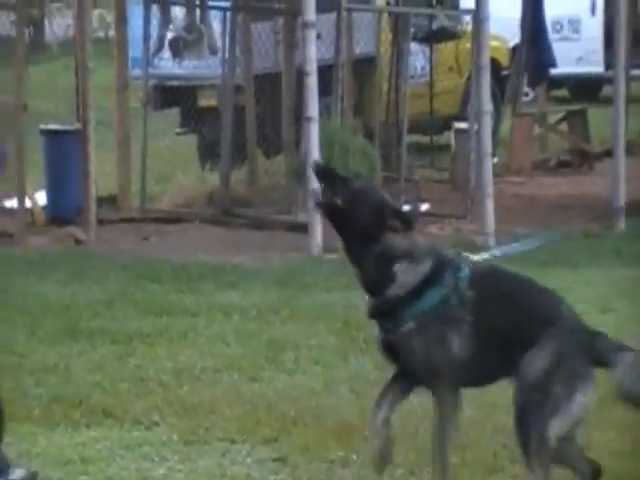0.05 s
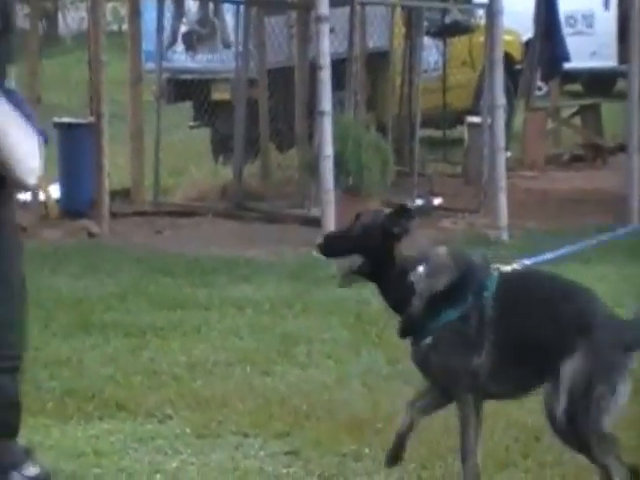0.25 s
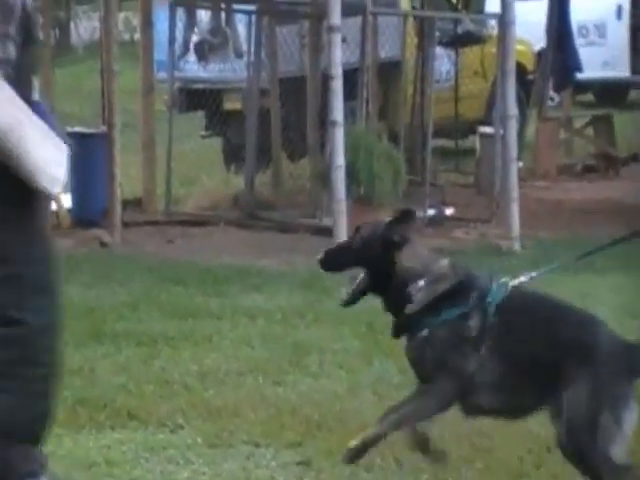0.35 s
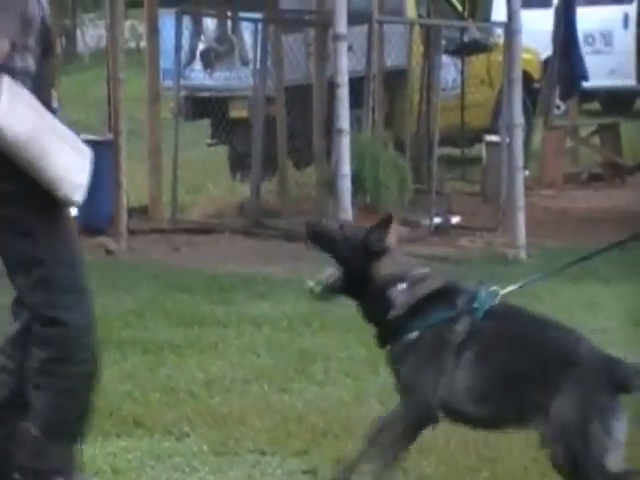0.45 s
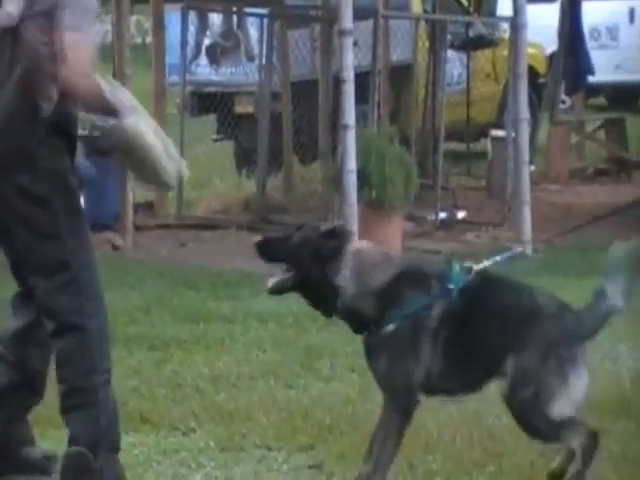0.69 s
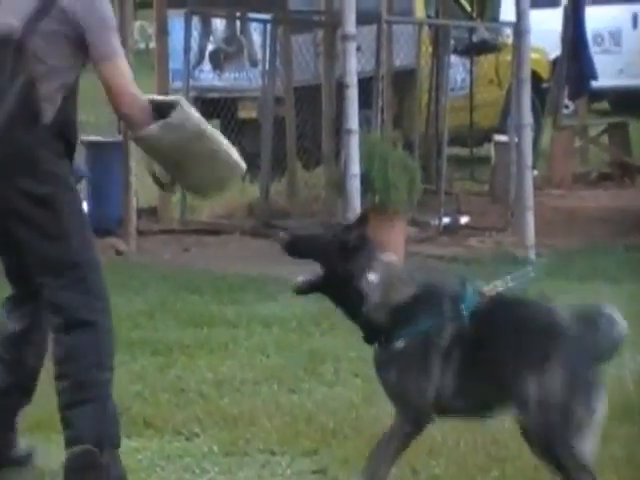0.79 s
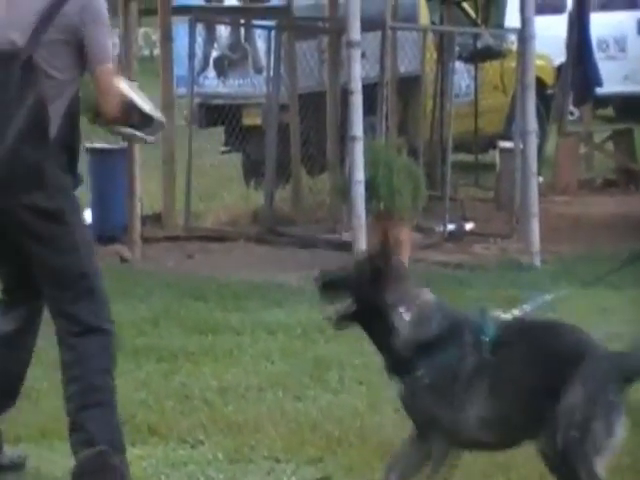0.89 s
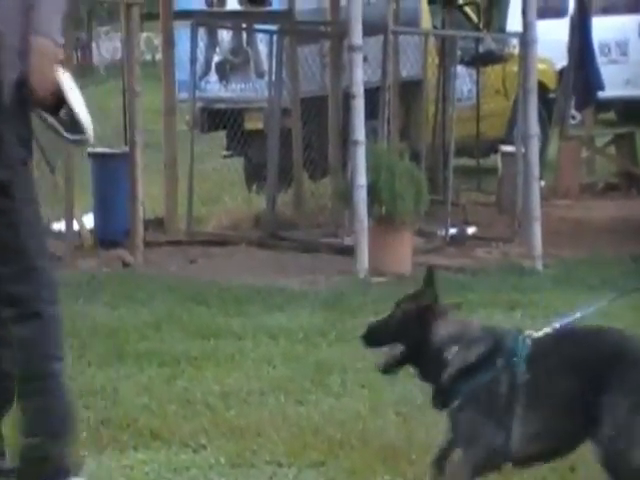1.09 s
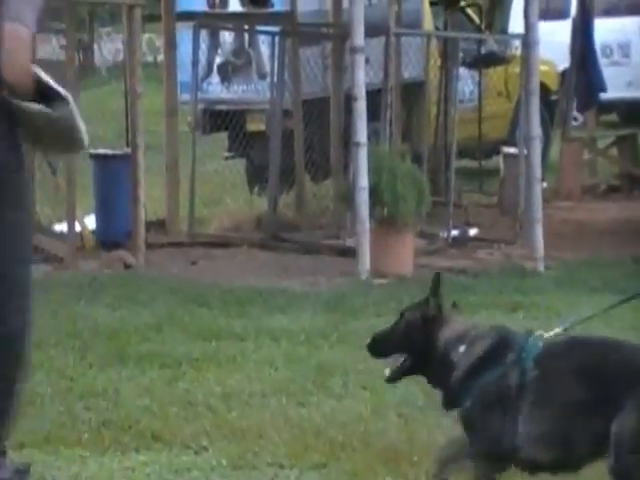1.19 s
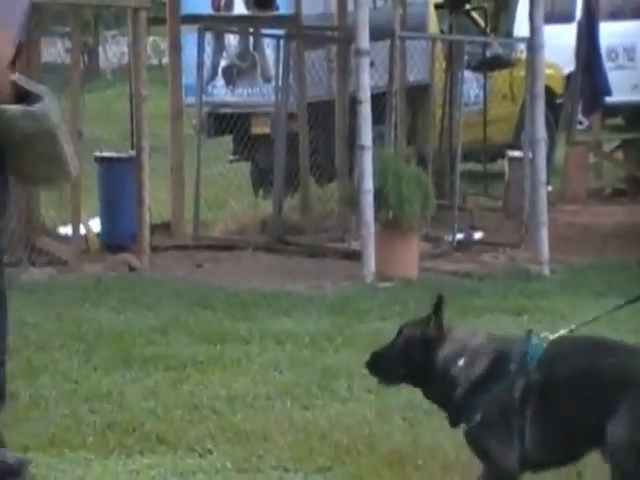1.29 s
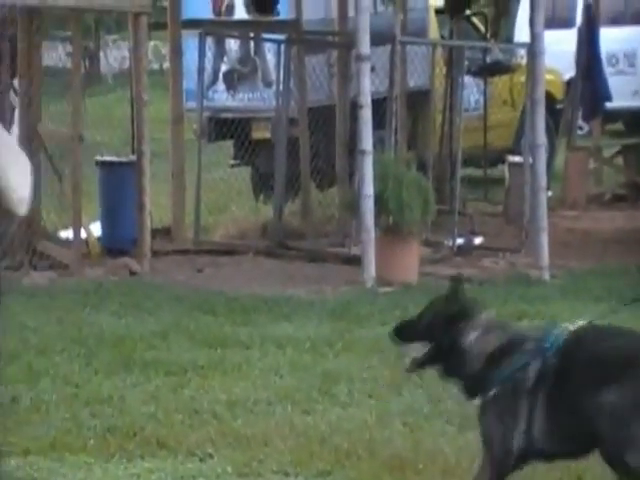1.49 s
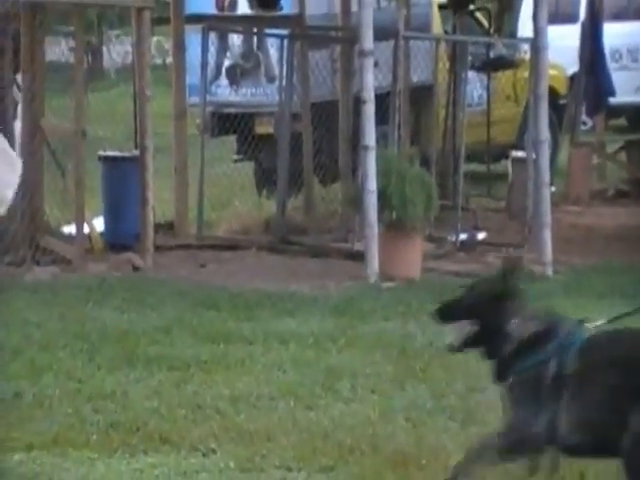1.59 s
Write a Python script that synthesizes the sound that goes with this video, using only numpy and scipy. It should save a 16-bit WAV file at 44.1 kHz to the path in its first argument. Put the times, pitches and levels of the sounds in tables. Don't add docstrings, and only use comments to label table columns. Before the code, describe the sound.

Close aggressive dog barks come first, then overlapping replies from two dogs further right, with a brief pant near the end. Open grassy yard with a dull echoing tail, heard through a small microphone that ducks on peaks.

```python
import sys
import numpy as np
from scipy import signal
from scipy.fft import rfft, irfft
from scipy.io import wavfile
from scipy.ndimage import uniform_filter1d

SR = 44100
rng = np.random.default_rng(int(sys.argv[2]) if len(sys.argv) > 2 else 0)


def voltage_ratio(level):
    return 10 ** (np.asarray(level, float) / 20)


def dump(signal):
    limited = np.clip(np.atleast_2d(signal).T, -1, 1)
    pcm = np.round(limited * 32767).astype(np.int16)
    wavfile.write(sys.argv[1], SR, pcm)


N = 72765

# time in seconds, pitch in Hz, level in dB, breath hiss in dB re the voice.
NEAR_BARK_1 = [(.21, 486, -34, -34), (.216, 525, -15, -38), (.226, 585, -5, -30), (.237, 680, -7, -33),
               (.24, 345, -10, -33), (.262, 388, -7, -31), (.284, 397, -6, -33), (.291, 350, -17, -30),
               (.298, 300, -32, -25)]
NEAR_BARK_2 = [(.652, 400, -36, -30), (.664, 560, -13, -38), (.67, 590, -5, -40), (.685, 800, -7, -37),
               (.688, 390, -11, -34), (.713, 432, -7, -32), (.724, 420, -14, -28), (.745, 398, -13, -25),
               (.76, 390, -25, -20)]
DEEP_BARK_1 = [(0.755, 481.1, -13.5, -21), (0.781, 603.3, -25.5, -22), (0.809, 625, -18, -21.5),
               (0.825, 676.1, -9, -33.5), (0.837, 630.3, -21, -15.5), (0.851, 602.6, -16.5, -24.5),
               (0.89, 323.4, -27, -26)]
DEEP_BARK_2 = [(1.155, 508.5, -25.5, -22.5), (1.177, 541.9, -23.5, -16.5), (1.197, 619.3, -15.5, -17.5),
               (1.227, 680, -17.5, -18.5), (1.241, 636.4, -16, -21.5), (1.259, 524.5, -18.5, -23.5),
               (1.285, 302, -34.5, -39)]
HIGH_BARK_1 = [(1.136, 605.8, -36, -20), (1.15, 736.9, -19, -27), (1.164, 821.2, -24.5, -54),
               (1.188, 845.2, -15, -37), (1.21, 747.7, -30, -33), (1.235, 649, -10.5, -34)]
HIGH_BARK_2 = [(1.632, 614, -21, -40), (1.642, 797.6, -56, -54), (1.65, 800.5, -8.5, -23)]
EARLIER_ECHO = [(.07, 400, -54, -30), (.13, 416, -45, -50), (.2, 400, -51, -33)]
DEEP_GRUNT = [(1.11, 300, -46, -41), (1.125, 308, -36, -30), (1.155, 400, -49, -22)]
ROUGHNESS = [
    (.18, .35),
    (.32, .5),
    (.6, .4),
    (.55, .36),
    (.22, .55),
    (.3, .3),
    (.8, .8),
    (.4, .4),
]
# centre in Hz, width in Hz, gain in dB.
NEAR_THROAT = [(400, 220, -36.5), (700, 600, -10), (1209, 147, 12.5), (1576, 640, -0.5), (2203, 640, -8)]
DEEP_THROAT = [(610, 200, 1.5), (1110, 550, 3), (1850, 970, -4), (2700, 100, -36)]
HIGH_THROAT = [(780, 100, 4.5), (1570, 140, 7.5), (2220, 1200, -14.5)]
# frequency in Hz, density in dB per Hz.
HISS_COLOUR = [(1500, -58), (3000, -6.5), (3900, -15), (5000, -5), (7500, -7), (10000, -16), (12500, -26.5),
               (14500, -58)]
# centre in seconds, length in seconds, level in dB.
PANT_PUFFS = [
    (1.468, 0.04, -33),
    (1.43, 0.018, -40),
    (3.1, 0.047, -36.5),
    (1.125, .04, -45.5),
]
# frequency in Hz, density in dB.
PANT_COLOUR = [(120, -53), (500, -0.5), (1300, 0.5), (3100, -3.5), (4000, -17), (6500, -11.5), (10000, -19),
               (13500, -47)]
# delay in seconds, level in dB, left over right in dB.
ECHOES = [
    (0.069, -19.5, -5.5),
    (0.106, -24.5, 10),
    (0.159, -36, 2),
    (.23, -51.5, -26),
]
# frequency in Hz, level in dB, 60 dB decay in seconds.
SHED_MODES = [
    (652, -62, .5),
    (1165, -83, 2.0),
]
# frequency in Hz, density in dB.
RUSTLE_COLOUR = [(30, -36.5), (155, -8.5), (600, -0.5), (1300, -7), (2600, -9.5), (4000, -13.5),
                 (9000, -17.5), (15000, -36.5)]
# frequency in Hz, likeness from 0 to 1.
AIR_LIKENESS = [(60, 0.94), (210, 1), (740, 0.39), (2600, 0.45)]

JITTER, SHIMMER_DB, WOBBLE_HZ = 0.08, 4, 200
PHASE_SCATTER = 0.9
HALF_CYCLE = 0.35
THROAT_TOP_HZ, HISS_PATCH_DB, MIC_LOW_HZ = 2520, 3, 270
NEAR_PAN_DB, FAR_PAN_DB, FAR_LOW_PAN_DB, FAR_YARD_PAN_DB = -2, -4.5, -5, -3
FAR_SPLIT_HZ = 900
YARD_DB, YARD_T60_S, YARD_LOW_HZ, YARD_HIGH_HZ = -18, 1.304, 516, 2500
ECHO_CUT_HZ, ECHO_SMEAR_S = 12000, 0.024
NEAR_ECHO_BRIGHT, FAR_ECHO_BRIGHT = 5.6, 0.19
RUSTLE_DB = -46.5
INSECT_HZ, INSECT_WIDTH_HZ, INSECT_DB = 5400, 540, -55.5
AGC_START_DB, AGC_SHARE, AGC_BACK_DB_PER_S, AGC_AHEAD_S = -24, 0.098, 37.5, 0.006
MIC_BEND, CLIP = 0.024, 1


def rms_one(x):
    return x / np.sqrt(np.mean(x ** 2) + 1e-20)


def at_hz(points, hz):
    table = np.array(points)
    return np.interp(np.log(hz), np.log(table[:, 0]), table[:, 1])


def drift(size, hz):
    r = np.exp(-2 * np.pi * hz / SR)
    settle = 9000
    noise = rng.standard_normal(size + settle)
    return rms_one(signal.lfilter([1], [1, -2 * r, r * r], noise)[settle:])


def coloured(spectrum, size):
    hz = np.arange(size // 2 + 1) * SR / size + 1
    white = rfft(rng.standard_normal(size))
    return rms_one(irfft(white * voltage_ratio(at_hz(spectrum, hz)), size))


def pan(x, db):
    return x * voltage_ratio(np.array([[db / 2], [-db / 2]]))


def air():
    hz = np.arange(N // 2 + 1) * SR / N + 1
    alike = np.clip(at_hz(AIR_LIKENESS, hz), 0, 1)
    mid, side = rfft(rng.standard_normal((2, N)))
    both = np.sqrt(1 + alike) * mid + np.sqrt(1 - alike) * side * [[1], [-1]]
    rustle = rms_one(irfft(both * voltage_ratio(at_hz(RUSTLE_COLOUR, hz)), N))
    rustle = rustle * voltage_ratio(RUSTLE_DB + 0.5 * drift(N, 2.2))
    chirp_band = 1 / (1 + (2 * (hz - INSECT_HZ) / INSECT_WIDTH_HZ) ** 4)
    insects = rms_one(irfft(both * chirp_band, N))
    insects = insects * voltage_ratio(INSECT_DB + 1.5 * drift(N, 25))
    return pan(rustle + insects, -2.1)


def throat_gain(throat, hz):
    resonances = sum(voltage_ratio(db) / (1 + (2 * (hz - f) / w) ** 2) for f, w, db in throat)
    return resonances / np.sqrt(1 + (hz / THROAT_TOP_HZ) ** 12)


def overtones(pitch, phase, r, throat):
    gains = [throat_gain(throat, k * pitch) for k in range(1, 11)]
    tone = 0
    for k, gain in enumerate(gains):
        shimmer = voltage_ratio(SHIMMER_DB * r * drift(len(pitch), WOBBLE_HZ))
        stray = PHASE_SCATTER * r * np.sqrt(k) * drift(len(pitch), 100)
        tone = tone + gain * shimmer * np.sin((k + 1) * phase + k * k + stray)
    return np.sqrt(2) * tone / np.sqrt(sum(g ** 2 for g in gains))


def bark(rows, rough, throat, glide=500):
    s, hz, db, hiss_db = np.transpose(rows)
    first, size = int(s[0] * SR), int((s[-1] - s[0]) * SR)
    t = s[0] + np.arange(size) / SR
    r = np.interp(t, [s[0], s[0] + 0.031, s[0] + 0.0336], [rough[0], rough[0], rough[1]])
    r = np.clip(r, 0, 1)
    pitch = uniform_filter1d(np.interp(t, s, hz), size=glide, mode="nearest")
    phase = 2 * np.pi * np.cumsum(pitch * (1 + JITTER * r * drift(size, WOBBLE_HZ))) / SR
    tone = overtones(pitch, phase, r, throat)
    tone = tone * (1 + HALF_CYCLE * r * np.cos(phase / 2))

    grid = np.geomspace(100, 6000, num=60)
    turbulence = coloured(np.c_[grid, 20 * np.log10(throat_gain(throat, grid))], size)
    gate = 1 + 0.3 * np.cos(phase)
    voice = np.sqrt(1 - r ** 2) * tone + r * gate * turbulence
    hiss_level = voltage_ratio(np.interp(t, s, hiss_db) + HISS_PATCH_DB * drift(size, 62))
    voice = voice + hiss_level * gate * coloured(HISS_COLOUR, size)

    fade_end = s[-1] + (s[-1] > 1.64)
    edge = np.minimum(1, np.minimum(t - s[0], fade_end - t) / 0.0069)
    loudness = voltage_ratio(uniform_filter1d(np.interp(t, s, db), size=glide, mode="nearest"))
    out = np.zeros(N + SR)
    out[first:first + size] = voice * edge * loudness
    low_cut = signal.butter(2, MIC_LOW_HZ, "high", fs=SR, output="sos")
    return signal.sosfilt(low_cut, out[:N] + 1e-18)


def near_dog():
    first = bark(NEAR_BARK_1, ROUGHNESS[0], NEAR_THROAT, glide=60)
    return first + bark(NEAR_BARK_2, ROUGHNESS[1], NEAR_THROAT, glide=60)


def yard(x, bright):
    t = np.arange(N) / SR
    common, own = rng.standard_normal(N), rng.standard_normal((2, N))
    tail = voltage_ratio(YARD_DB - 60 * t / YARD_T60_S) * np.minimum(1, t / 0.01) / np.sqrt(0.1 * SR)
    band = signal.butter(1, [YARD_LOW_HZ, YARD_HIGH_HZ], "band", fs=SR, output="sos")
    response = signal.sosfilt(band, (common + 0.16 * own) * tail)

    late = 0
    for s, db, side_db in ECHOES:
        smear = voltage_ratio(db - 60 * np.abs(t - s) / ECHO_SMEAR_S) * (t > s)
        late = late + pan(smear, side_db) / 10
    b, a = signal.butter(1, ECHO_CUT_HZ, fs=SR)
    response = response + signal.lfilter(b, a, (common + 0.097 * own) * late)

    for hz, db, t60 in SHED_MODES:
        swell = np.minimum(1, t / 0.039) ** 2
        ring = np.sin(2 * np.pi * hz * t + 0.5 * drift(N, 36))
        response = response + voltage_ratio(db - 60 * t / t60) * swell * ring
    response = response - bright * np.diff(response, n=2, prepend=0, append=0)
    return signal.fftconvolve(response, x[None], axes=1)[:, :N]


def far_dogs():
    deep = bark(DEEP_BARK_1, ROUGHNESS[2], DEEP_THROAT) + bark(DEEP_BARK_2, ROUGHNESS[3], DEEP_THROAT)
    high = bark(HIGH_BARK_1, ROUGHNESS[4], HIGH_THROAT) + bark(HIGH_BARK_2, ROUGHNESS[5], HIGH_THROAT)
    distant = bark(EARLIER_ECHO, ROUGHNESS[6], NEAR_THROAT)
    grunt = bark(DEEP_GRUNT, ROUGHNESS[7], [(330, 140, -5), (1183, 296, 3.5)])
    return deep + high + distant + grunt


def aside(x):
    low = signal.sosfiltfilt(signal.butter(2, FAR_SPLIT_HZ, fs=SR, output="sos"), x)
    return pan(low, FAR_LOW_PAN_DB) + pan(x - low, FAR_PAN_DB)


def pants():
    t = np.arange(N) / SR
    puffs = sum(voltage_ratio(db) * np.exp(-(1.5 * (t - s) / d) ** 2) for s, d, db in PANT_PUFFS)
    return coloured(PANT_COLOUR, N) * puffs


def scene():
    near, far = near_dog(), far_dogs()
    mix = air() + pan(near, NEAR_PAN_DB) + yard(near, NEAR_ECHO_BRIGHT)
    mix = mix + aside(far) + voltage_ratio(7.0) * pan(yard(far, FAR_ECHO_BRIGHT), FAR_YARD_PAN_DB)
    return mix + pan(pants(), -2.5)


def band_limit(x):
    return signal.sosfilt(signal.butter(12, 15700, fs=SR, output="sos"), x)


def record(dry):
    t = np.arange(N) / SR
    level = 10 * np.log10(uniform_filter1d(np.mean(dry ** 2, axis=0), size=200) + 1e-12)
    over = np.maximum(level - AGC_START_DB, 0)
    recovery = AGC_BACK_DB_PER_S * t
    held = np.maximum.accumulate(over + recovery) - recovery
    duck_db = np.interp(t + AGC_AHEAD_S, t, uniform_filter1d(held, size=200))
    x = dry * voltage_ratio(-AGC_SHARE * duck_db)
    bend = x ** 2 - uniform_filter1d(x ** 2, size=1500)
    mix = np.clip(x + MIC_BEND * bend, -CLIP, CLIP)
    return band_limit(mix)


dry = scene()
out = record(dry)
dump(out)
```